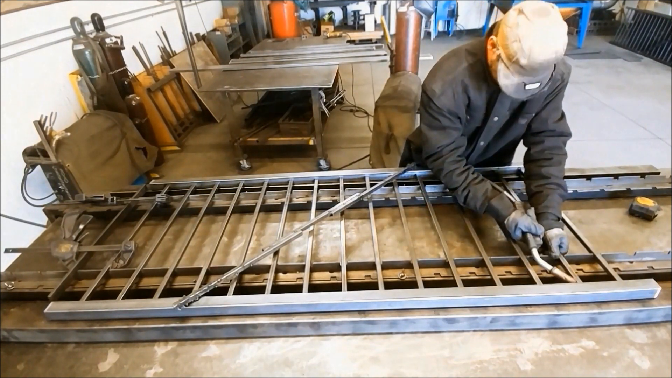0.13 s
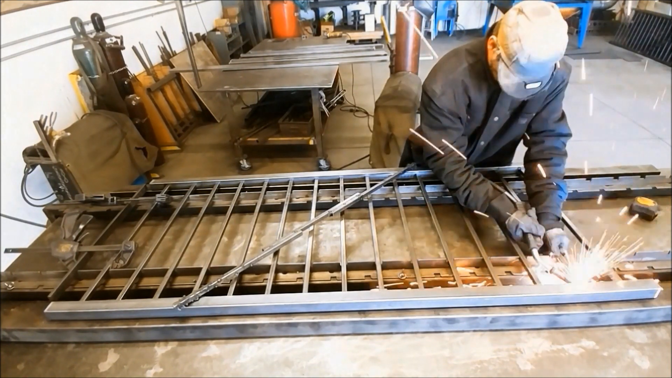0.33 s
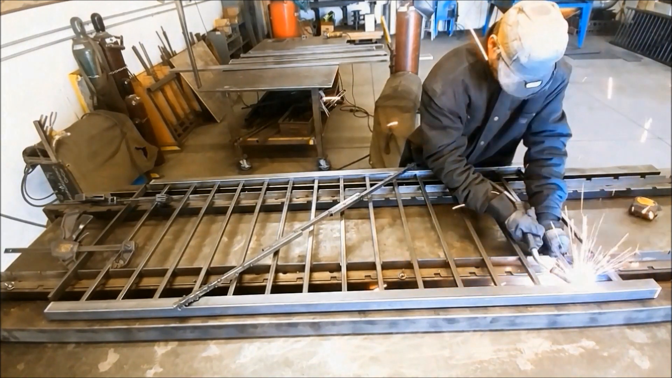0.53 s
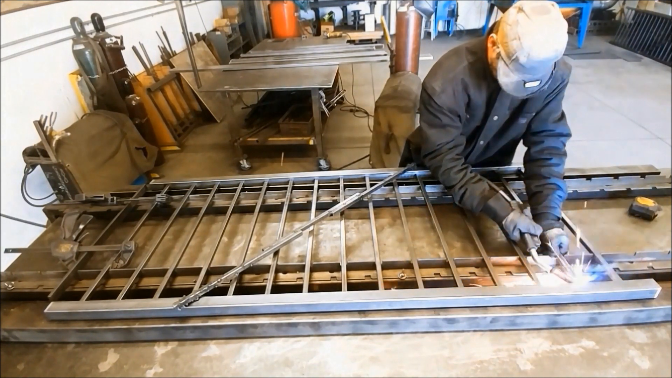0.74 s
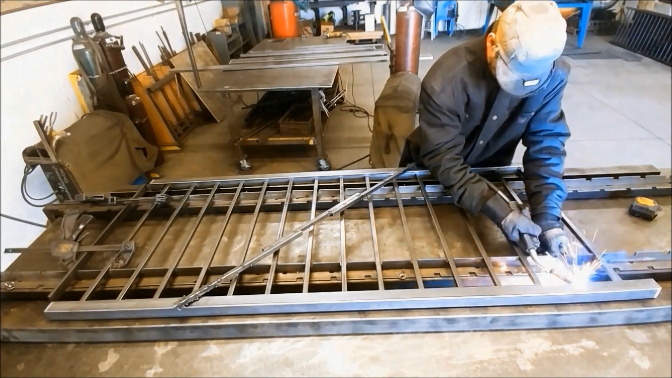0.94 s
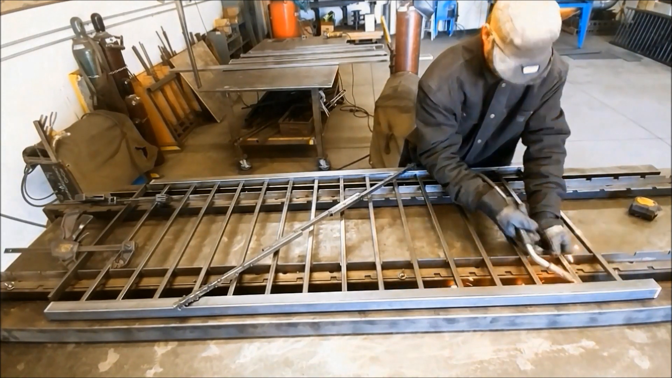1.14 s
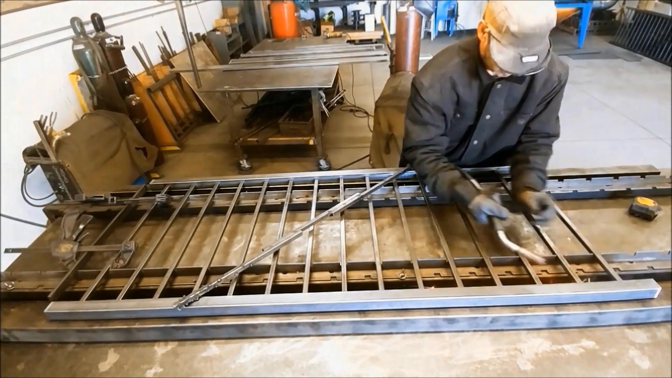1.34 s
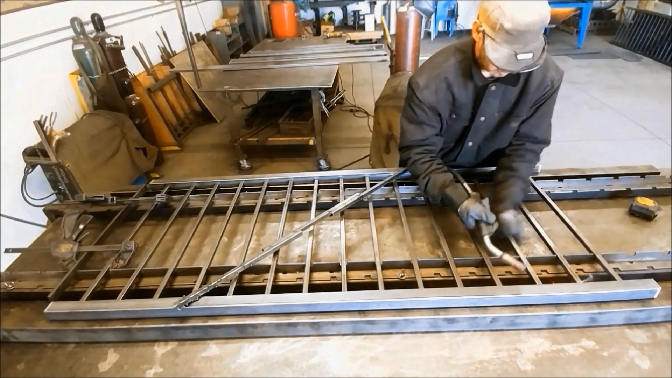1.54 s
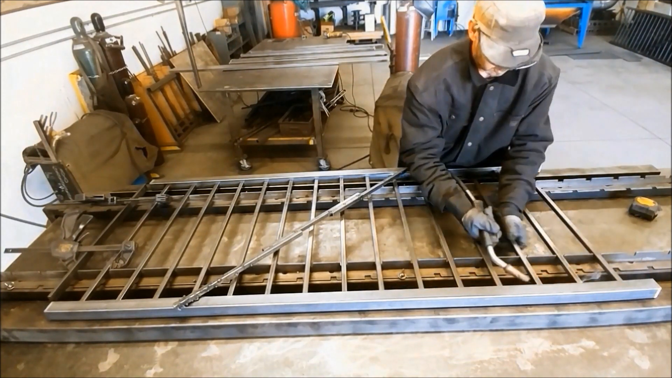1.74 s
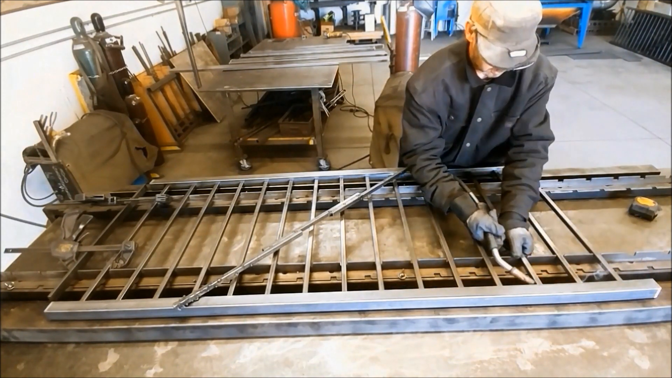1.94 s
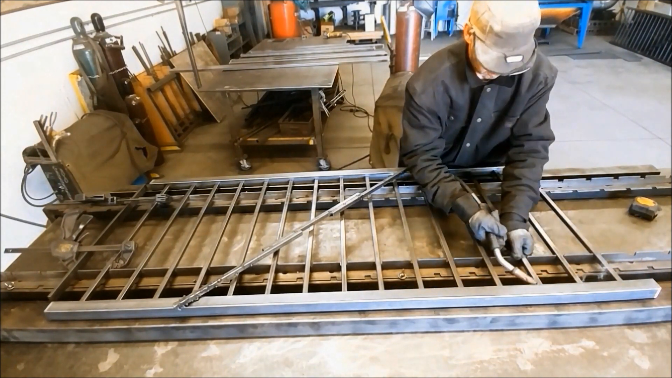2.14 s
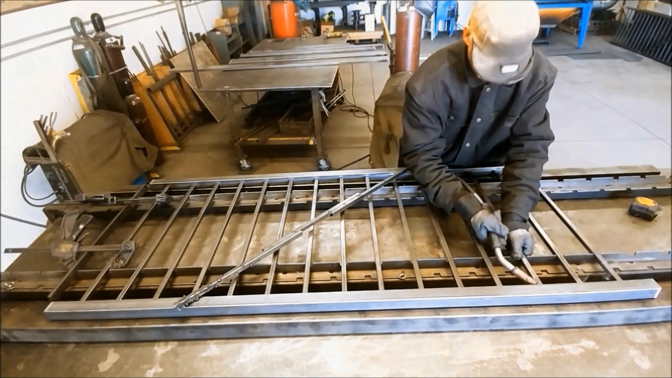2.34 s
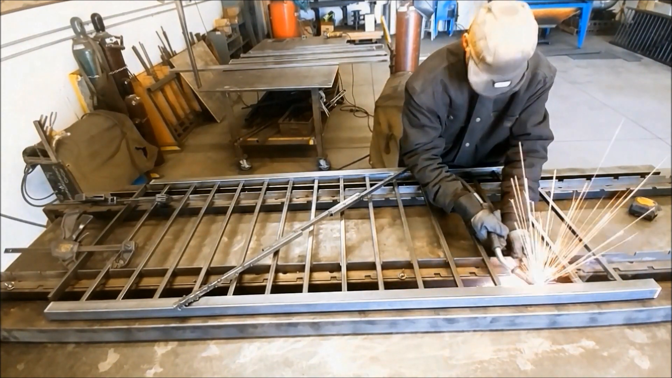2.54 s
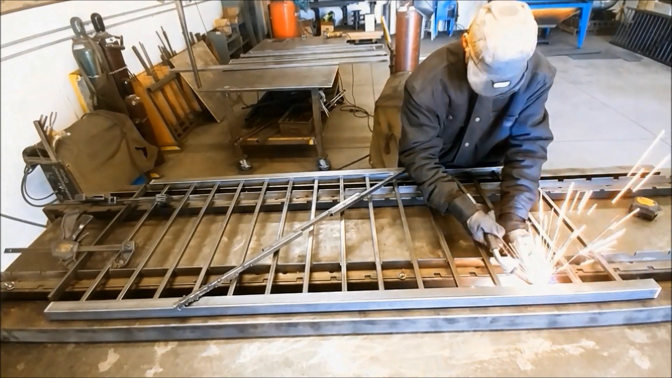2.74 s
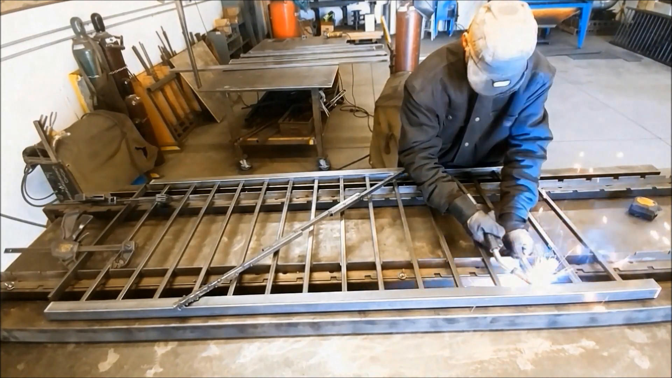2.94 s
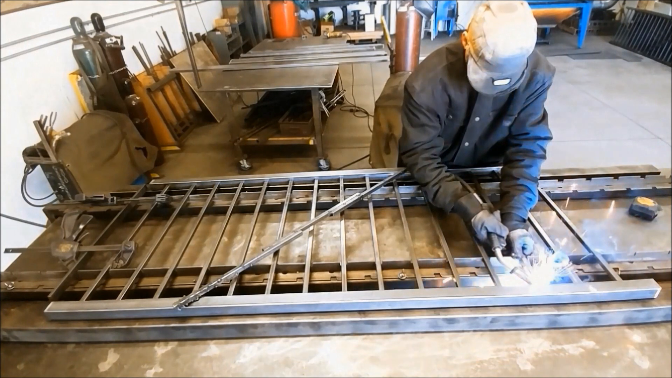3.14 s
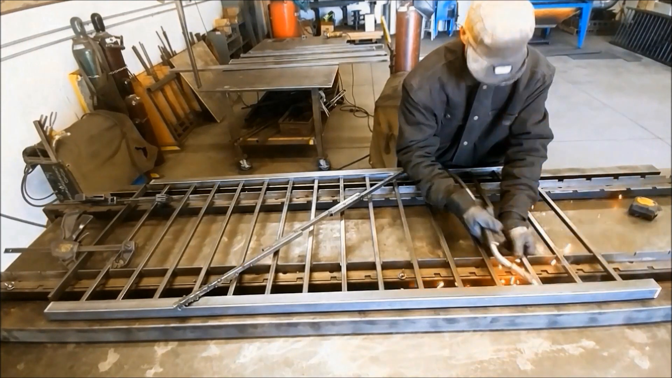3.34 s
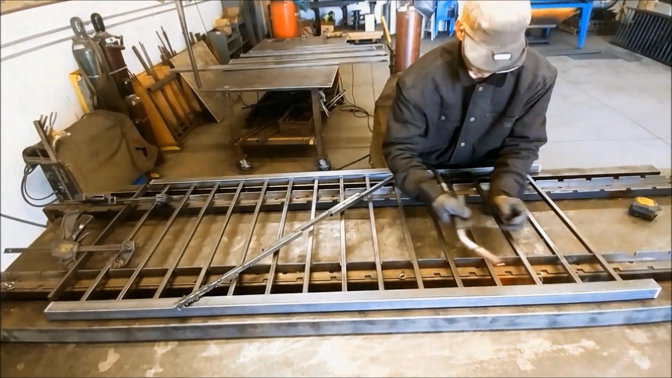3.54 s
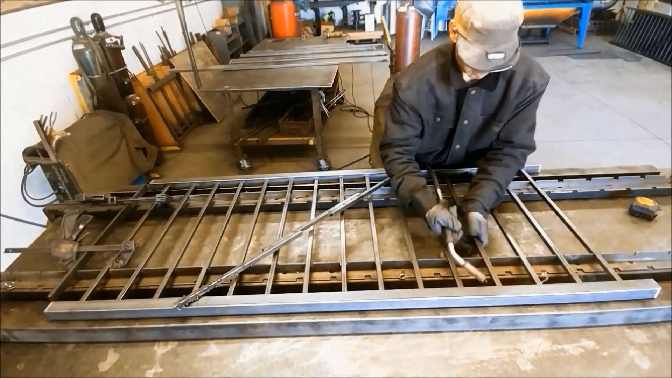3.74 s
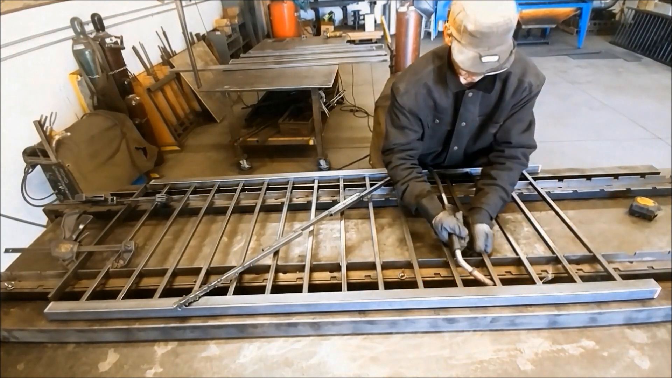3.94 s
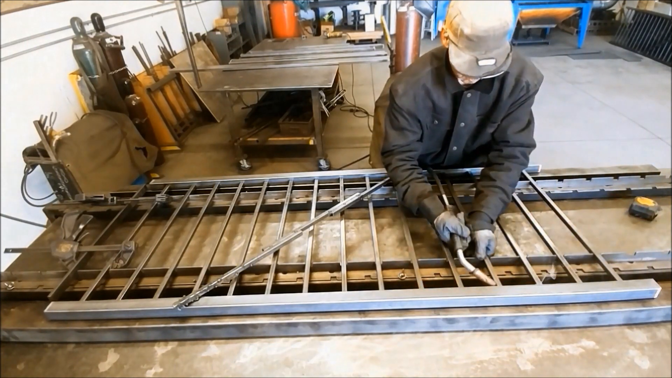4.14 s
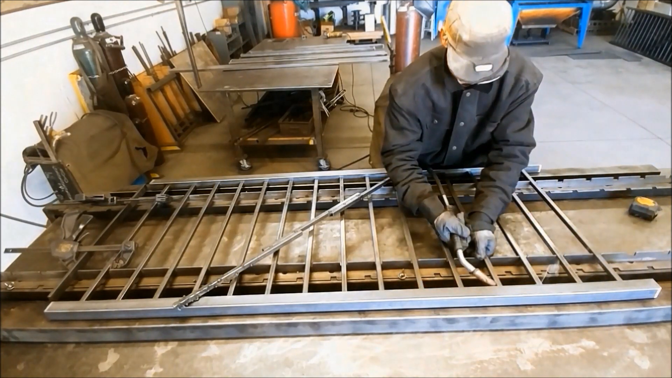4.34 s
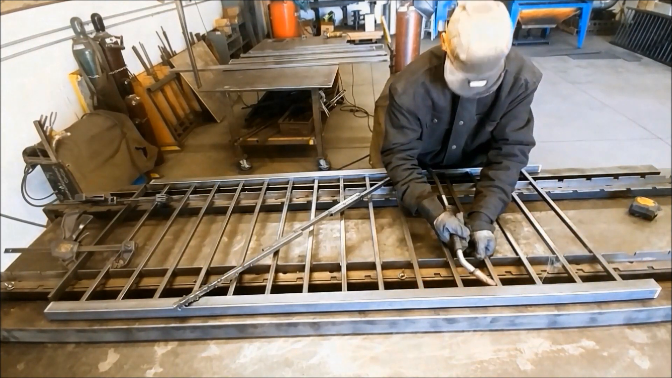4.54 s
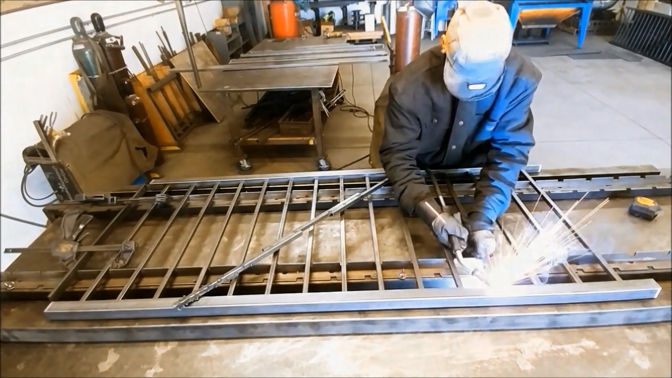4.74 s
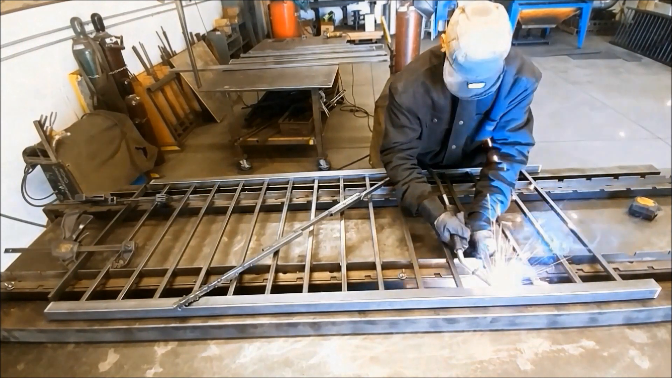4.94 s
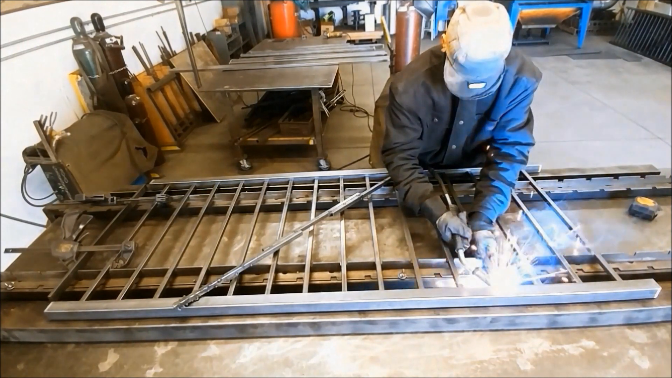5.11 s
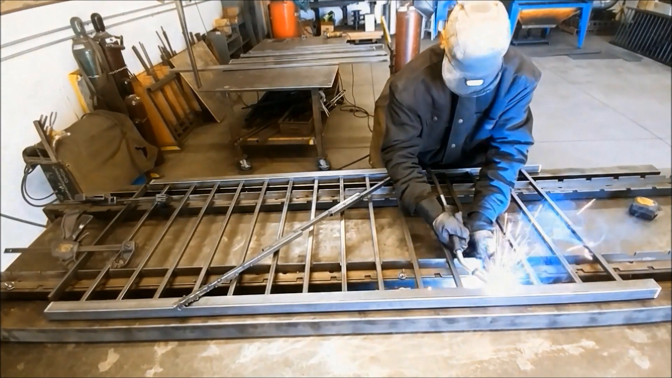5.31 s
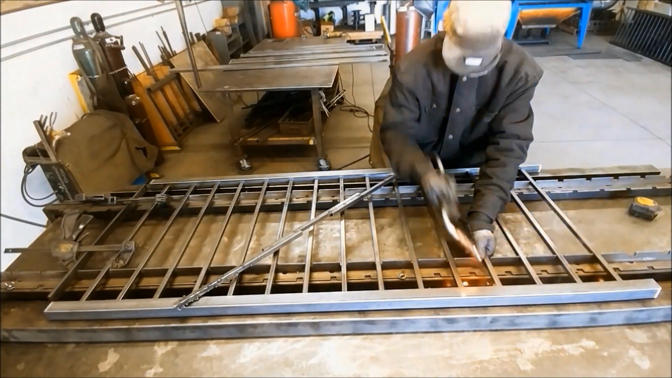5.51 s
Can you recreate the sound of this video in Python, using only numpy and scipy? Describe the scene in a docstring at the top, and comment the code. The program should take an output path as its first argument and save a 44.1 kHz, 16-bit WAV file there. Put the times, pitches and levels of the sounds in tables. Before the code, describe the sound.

In an echoing metal workshop with a faint, low machine hum, a welding arc snaps to life and crackles brightly for about a second. It stops, and steel gives one sharp clink. A second burst of sizzling and popping follows, then a softer knock, then a third burst. A little gas hiss and motor whir sit under each weld. The microphone is a few metres off, with the welding louder on the right.

```python
"""In a hard-walled workshop, three MIG tack welds on a steel railing are heard from a few metres.
Machines hum throughout. For each weld the trigger ticks, gas hisses and the wire motor whirs; the wire
strikes with a bang and flares, then shorts and re-ignites about a hundred times a second, crackling.
Steel knocks between the welds. The shop echoes, two microphones pick it up and a limiter tames the snaps.
"""
import sys
import numpy as np
from scipy import signal
from scipy.fft import rfft, irfft, next_fast_len
from scipy.io import wavfile
from scipy.ndimage import uniform_filter1d, minimum_filter1d

SR = 44100
rng = np.random.default_rng(int(sys.argv[2]) if len(sys.argv) > 2 else 0)


def persist_wave(psi):
    """Save psi, clipped to +-1, as 16-bit WAV."""
    counts = np.round(np.clip(psi, -1, 1) * 32767).astype(np.int16)
    wavfile.write(sys.argv[1], SR, np.atleast_2d(counts).T)


N = 245636
TIME = np.arange(N) / SR


def undb(db):
    """Turn decibels into a number to multiply by."""
    return 10 ** (np.asarray(db) / 20)


def unit(x):
    """Scale a sound to an average (rms) level of 1."""
    return x / np.sqrt(np.mean(x ** 2))


def at_hz(points, hz):
    """Read between (Hz, value) points, with octaves evenly spaced."""
    points_hz, values = np.transpose(points)
    return np.interp(np.log(np.maximum(hz, 1)), np.log(points_hz), values)


def convolve(x, response):
    """Make every sample of a sound set off a copy of the response."""
    return signal.fftconvolve(x, response)[:N]


def colour(x, points, size=4096):
    """Shape a sound's tone with a curve of (Hz, dB) points."""
    gains = undb(at_hz(points, np.fft.rfftfreq(size, 1 / SR)))
    cepstrum = irfft(np.log(gains))
    # make the filter ring after a sound, never before it
    cepstrum[1:size // 2] *= 2
    cepstrum[size // 2 + 1:] = 0
    return convolve(x, irfft(np.exp(rfft(cepstrum))))


def wavering(hz, width_hz):
    """An unsteady tone, made from a narrow band of noise."""
    size = next_fast_len(N, True)
    band = np.exp(-2 * ((np.fft.rfftfreq(size, 1 / SR) - hz) / width_hz) ** 2)
    return unit(irfft(band * rfft(rng.standard_normal(size)), size)[:N])


def impulses(times, db):
    """One click at each time."""
    return np.bincount((times * SR).astype(int), undb(db), N)[:N]


# The machines' hum. Each row: pitch in Hz, relative level in dB.
HUM_TONES = [(80.7, -74), (134.6, -69.5), (193.8, -78.5), (274.5, -74.5), (506.0, -92), (597.5, -81.5),
             (678.3, -93)]
# The steady background rush: fans in the low and middle range, a faint even hiss in the treble. Each row:
# frequency in Hz, relative level in dB.
BACKGROUND_CURVE = [(15, -77), (25, -46.5), (66, -14.5), (103, -9), (139, -1.5), (163, -12.5), (191, -17.5),
                    (219, -14.5), (278, -12.5), (404, -17), (790, -22), (2020, -43), (8550, -53.5), (15000, -57.5)]

def machines(hum_width_hz=8, hum_db=-1, background_db=-65):
    """Fans and machines hum in the shop; the bass is much alike on both sides."""
    hum = sum(undb(db + hum_db) * wavering(hz, hum_width_hz) for hz, db in HUM_TONES)
    shared, side = (unit(colour(rng.standard_normal(N), BACKGROUND_CURVE)) for _ in range(2))
    side = colour(side, [(120, -7), (600, -3), (2000, 0)])
    return hum + undb(background_db) * np.array([shared + side, shared - side])


# Steel and torch knock on the railing, and the trigger ticks. Each row: start in seconds, level in dB,
# rise and fade in seconds, brightness in dB per octave, nozzle ping in dB relative to the knock.
KNOCKS = [(.227, -58.5, 0.0041, 0.038, -4.5, -7.5), (1.5717, -22.5, 0.0071, 0.0049, 1, -10),
          (2.458, -71, .001, .003, 10, -20), (3.7121, -36.5, 0.012, 0.011, -1.5, -12),
          (4.117, -52, 0.0027, 0.0058, -0.5, -7.5), (4.581, -69.5, .001, .003, 11.5, -19)]
# The tone of a knock. Each row: frequency in Hz, relative level in dB.
KNOCK_CURVE = [(100, -10.5), (300, -4.5), (750, 3.5), (1400, 1), (3000, 4.5), (4500, -1), (6000, 1),
               (8000, -10), (15000, -13.5)]
# The railing's ringing notes. Each row: pitch in Hz, relative level in dB, seconds to fade by 60 dB.
RAILING_NOTES = [(2565, -8.5, 0.2), (2580, -6, 0.14), (3400, 4, .06), (4004, -11, .06), (4430, -2.5, .08),
                 (5070, -12.5, .06), (5470, 4, 0.074), (6380, 15, 0.025)]

def knocks(nozzle_hz=4400, ring_db=-27):
    """Metal chatters briefly on metal, the torch nozzle pings and the railing rings on."""
    contact, nozzle = np.zeros(N), wavering(nozzle_hz, width_hz=770)
    for start, db, rise_s, fade_s, bright_db, ping_db in KNOCKS:
        age = np.maximum(TIME - start, 0)
        shape = np.minimum(age / rise_s, 1) * np.exp(-np.clip((age - rise_s) / fade_s, 0, 20))
        tilted = [(hz, level + bright_db * np.log2(hz / 3000)) for hz, level in KNOCK_CURVE]
        chatter = unit(colour(rng.standard_normal(N), tilted))
        contact += undb(db) * shape * (chatter + undb(ping_db) * nozzle)
    age = TIME[:SR]
    ring = sum(undb(db - 60 * age / ring_s) * np.sin(2 * np.pi * hz * age)
               for hz, db, ring_s in RAILING_NOTES)
    return contact + undb(ring_db) * convolve(contact, ring / np.linalg.norm(ring))


# The trigger is held. Each row: start and end in seconds, gas level in dB, motor level in dB.
TRIGGER_HOLDS = [(0.257, 1.203, -59, -69.5), (2.484, 3.353, -56.5, -68), (4.607, 5.408, -55, -66)]
# The hiss of the gas. Each row: frequency in Hz, relative level in dB.
GAS_CURVE = [(100, -3.5), (450, 15), (1000, 7.5), (2500, 2), (4500, 8), (8000, 4), (15000, 3.5)]

def gas_and_motor(motor_hz=293, ramp_s=0.012, groan=5, groan_s=0.034):
    """Shielding gas hisses and the wire motor whirs; the motor groans as it starts."""
    gas = unit(colour(rng.standard_normal(N), GAS_CURVE))
    motor = wavering(motor_hz, width_hz=160)
    out = 0
    for start, end, gas_db, motor_db in TRIGGER_HOLDS:
        held = np.clip(np.minimum(TIME - start, end - TIME) / ramp_s, 0, 1)
        load = 1 + groan * np.exp(-abs(TIME - start) / groan_s)
        out = out + held * (undb(gas_db) * gas + undb(motor_db) * load * motor)
    return out


# The wire shorts steadily in the molten pool. Each row: start and end in seconds, snap strength in dB,
# time of a surge in the snaps in seconds, extra strength there in dB, relative sizzle level in dB.
WELDS = [(0.403, 1.083, -1, 0.62, 9, -3.5), (2.715, 3.276, -4.5, 3.04, 4.5, -3),
         (4.765, 5.345, -1, 4.85, 3, -1.5)]
# A bright hiss swells with hardly a snap, during a weld or as it ends.
# Each row: start and length in seconds, relative sizzle level in dB.
HISS_SWELLS = [(0.304, .012, 0.5), (0.759, 0.044, 2), (0.789, 0.026, -4.5), (1.031, .022, -1.5),
               (1.089, 0.008, 4), (2.571, .004, -2.5), (2.673, 0.016, 3.5), (4.707, 0.02, -4.5),
               (5.341, 0.013, -6)]

def arc_levels(surge_s=.13, finish_db=6, finish_s=.18, swell_snap_db=-13.5,
               rise_db_per_s=850.5, fall_db_per_s=280.5):
    """Snap and sizzle strength in dB: each weld surges once and builds at its end as the pool fills."""
    snap, sizzle = np.full((2, N), -200)  # silence
    for start, end, snap_db, surge_at, surge_db, sizzle_db in WELDS:
        burning = (TIME >= start) & (TIME < end)
        surge = surge_db * np.exp(-((TIME - surge_at) / surge_s) ** 2)
        finish = finish_db * np.exp(-abs(end - TIME) / finish_s)
        snap = np.where(burning, snap_db + surge + finish, snap)
        sizzle = np.where(burning, sizzle_db, sizzle)
    for start, length, db in HISS_SWELLS:
        age = TIME - start
        slopes_db = np.minimum(age * rise_db_per_s, (length - age) * fall_db_per_s)
        sizzle = np.maximum(sizzle, db + np.minimum(slopes_db, 0))
        snap = np.where((age >= 0) & (age < length), swell_snap_db, snap)
    return snap, sizzle


# Cold wire hits the steel and blows apart. Each row: time in seconds, crack and thump strength in dB.
STRIKES = [(0.2843, 12, 6), (0.4004, 4.5, 12.5), (2.5509, 6, 10), (4.6906, 13.5, 9.5)]
# A large drop bursts with a dull pop. Each row: time in seconds, thump strength in dB.
POPS = [(0.7353, 5.5), (0.95, 3), (1.0023, 9), (1.0166, 6.5), (2.7192, 6.5), (2.798, -1), (2.981, 10.5),
        (3.2735, 7.5), (4.7701, 10), (5.081, 3.5)]
# The tone of the arc's crack, thump and sizzle. Each row: frequency in Hz, boost or cut in dB.
CRACK_CURVE = [(100, -22), (800, -16), (2000, -8), (3500, -5), (7000, -4), (12000, -5), (15500, 3.5)]
THUMP_CURVE = [(20, -14), (55, 0), (150, 1), (380, 2.5), (600, 5.5), (850, 1), (1150, 0), (1480, 6.5),
               (1750, -4.5), (2300, -21), (5000, -23), (15000, -11.5)]
SIZZLE_CURVE = [(100, -24.5), (2000, -16.5), (4000, -7), (7000, -5), (9000, 0), (14000, -1.5), (15500, 3)]

def arc(snaps_per_s=110, jitter=.33, crack_s=0.0013, spatter_s=0.00064,
        crack_db=-17.5, thump_db=-12, sizzle_db=-32):
    """Each re-ignition cracks and shoves the air with a thump; between shorts the open arc sizzles."""
    gap_luck, crack_luck, thump_luck = rng.standard_normal((1200, 3)).T
    times = np.cumsum(np.exp(jitter * gap_luck) / snaps_per_s)
    snap_db, hiss_db = arc_levels()
    strength_db = np.interp(times, TIME, snap_db)
    pops = [(s, db - 7.5, db) for s, db in POPS]  # less crack than thump
    bang_times, bang_crack_db, bang_thump_db = np.transpose(STRIKES + pops)
    cracks = impulses(times, strength_db + 3 * crack_luck) + impulses(bang_times, bang_crack_db)
    thumps = impulses(times, strength_db - 4.5 + 4 * thump_luck) + impulses(bang_times, bang_thump_db)
    age = TIME[:SR // 50]
    bursts = convolve(cracks, np.exp(-(age / crack_s) ** 2)) * rng.standard_normal(N)
    # fine spatter makes the sizzle grainy
    spatter = impulses(rng.uniform(0, N / SR, size=20000), db=3 * rng.standard_normal(20000))
    grains = unit(convolve(spatter, np.exp(-age / spatter_s)))
    sizzle = grains * rng.standard_normal(N) * undb(hiss_db)
    return (undb(crack_db) * colour(bursts, CRACK_CURVE)
            + undb(sizzle_db) * colour(sizzle, SIZZLE_CURVE)
            + undb(thump_db) * colour(thumps, THUMP_CURVE))


# Dull, low bumps. Each row: start in seconds, level in dB.
BUMPS = [(.29, -55), (1.016, -44), (4.695, -42), (4.775, -47)]

def bumps(centre_hz=56, width_hz=32, swell_s=0.0097):
    """Short, soft swells of bass under the arc."""
    swells = 0
    for start, db in BUMPS:
        age = np.maximum(TIME - start, 0) / swell_s
        swells = swells + undb(db) * age * np.exp(1 - age)
    rumble_cut = signal.butter(2, centre_hz - width_hz / 2, "high", fs=SR, output="sos")
    return signal.sosfilt(rumble_cut, swells * wavering(centre_hz, width_hz))


# How long the shop echoes. Each row: frequency in Hz, seconds to fade by 60 dB.
ECHO_TIMES = [(150, 0.96), (500, 1.13), (1400, 0.93), (2800, 0.64), (5600, 0.48), (8000, 0.38),
              (13000, 0.32)]

def shop_echo(wall_s=.0132, wall_fade_s=0.0075, wall_db=-7.5, bench_boost_db=2.5, tail_db=-3):
    """Sound scatters off the bench, bounces off the walls, then leaves a tail whose treble dies first."""
    age = TIME[:SR]
    hz, seconds, frames = signal.stft(rng.standard_normal(SR), SR, nperseg=256)
    fade = undb(-60 * seconds / at_hz(ECHO_TIMES, hz)[:, None])
    tail = signal.istft(frames * fade, SR)[1][:SR]
    tail = tail / np.linalg.norm(tail) * undb(tail_db + bench_boost_db * (age < wall_s))
    wall_shape = (age >= wall_s) * np.exp(-np.minimum(abs(age - wall_s) / wall_fade_s, 20))
    walls = rng.standard_normal(SR) * wall_shape
    return tail + undb(wall_db) * walls / np.linalg.norm(walls)


def shop(x, direct_db, patterns=5, shift_hz=50):
    """The direct sound plus a shifting blend of echo patterns, which keeps the tail smooth."""
    blend = np.array([wavering(0, shift_hz) for _ in range(patterns)])
    blend = blend / np.linalg.norm(blend, axis=0)
    return undb(direct_db) * x + sum(convolve(x * share, shop_echo()) for share in blend)


# The microphone openings ring near 8.5 kHz. Each row: frequency in Hz, boost or cut in dB.
MIC_CURVE = [(4000, -1), (4600, 4.5), (5200, 3), (5800, -2), (7100, 1.5), (7650, 8), (9150, 10.5),
             (9900, 0), (10650, -8.5), (11400, -2.5), (13500, 0), (15700, -7), (17500, -32.5)]
# The left microphone is shaded. Each row: frequency in Hz, left level minus right level in dB.
LEFT_SHADE = [(60, -12), (130, -5.5), (400, -0.5), (700, -1.5), (1300, -6.5), (2400, -6.5), (4400, -11),
              (8100, -17.5), (11000, -17), (15000, -22)]

def scene(shared_hz=260, left_lag_samples=11):
    """The shop reaches two microphones; the left faces away, so it hears the work later and duller."""
    work = colour(arc() + gas_and_motor() + knocks(), MIC_CURVE)
    left, right = shop(work, direct_db=-6), shop(work, direct_db=0)
    # long, low waves reach both microphones alike
    bass_only = signal.butter(1, shared_hz, fs=SR, output="sos")
    left = left + signal.sosfiltfilt(bass_only, right - left)
    left = colour(np.pad(left, (left_lag_samples, 0))[:N], LEFT_SHADE)
    return np.array([left, right + bumps()]) + machines()


def limiter(x, ceiling_db=-23, release_db_per_s=483, smooth_samples=33):
    """Hold peaks at the ceiling, then let the volume climb back at a steady rate."""
    over_db = np.maximum(20 * np.log10(abs(x) + 1e-9) - ceiling_db, 0)
    climb = release_db_per_s * TIME
    gain_db = climb - np.maximum.accumulate(over_db + climb)
    held_db = minimum_filter1d(gain_db, smooth_samples)
    return x * undb(uniform_filter1d(held_db, smooth_samples))


def record(dry, overload_db=-9.5, top_hz=15800):
    """Round off the hardest bangs, limit each channel and cut the highest treble."""
    rounded = undb(overload_db) * np.tanh(dry / undb(overload_db))
    limited = np.array([limiter(channel) for channel in rounded])
    treble_cut = signal.ellip(10, .2, 70, top_hz, fs=SR, output="sos")
    return signal.sosfilt(treble_cut, limited)


dry = scene()
out = record(dry)
persist_wave(out)
```